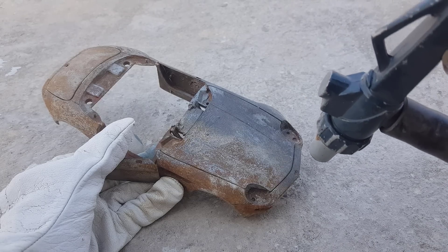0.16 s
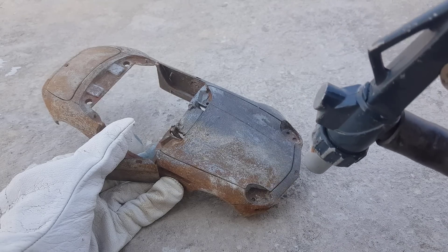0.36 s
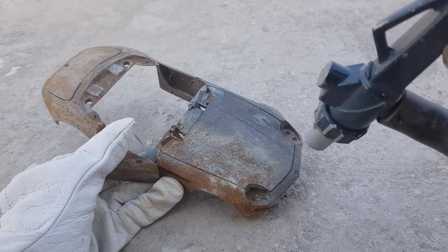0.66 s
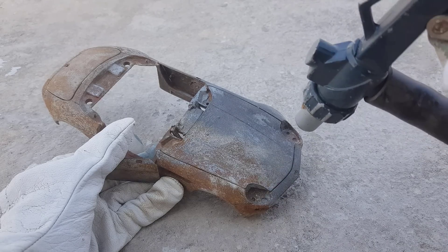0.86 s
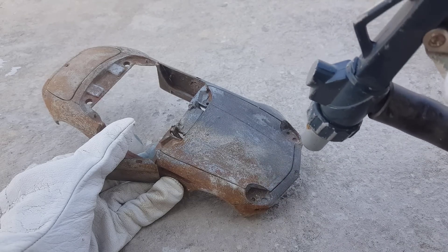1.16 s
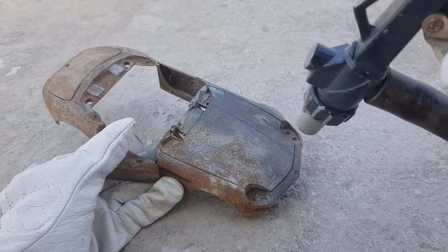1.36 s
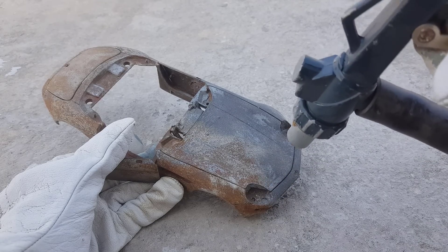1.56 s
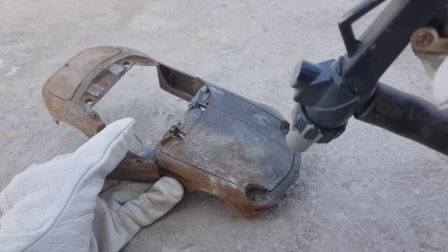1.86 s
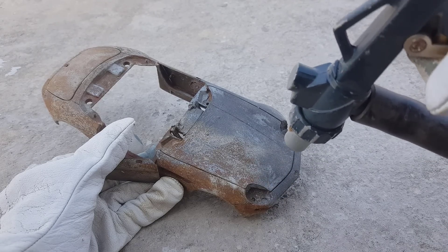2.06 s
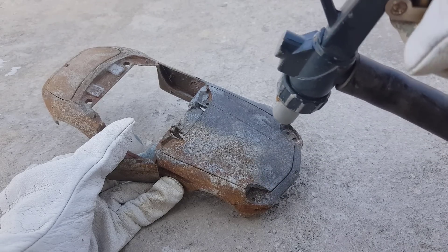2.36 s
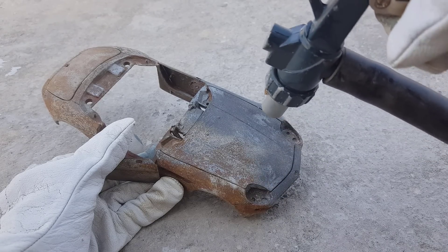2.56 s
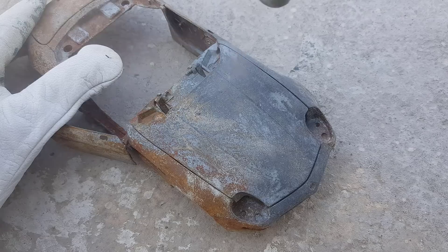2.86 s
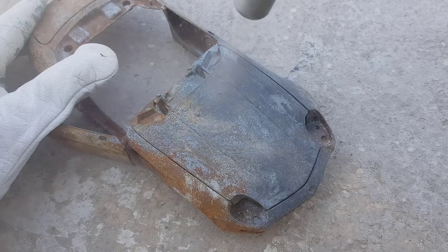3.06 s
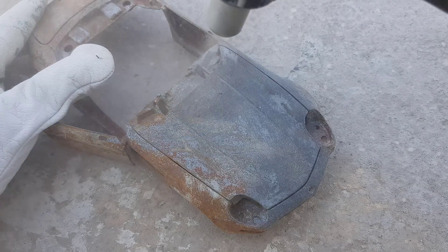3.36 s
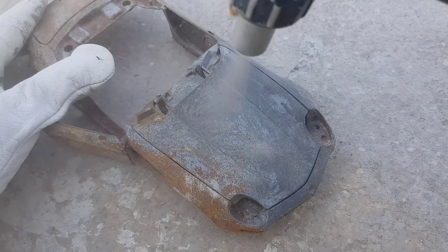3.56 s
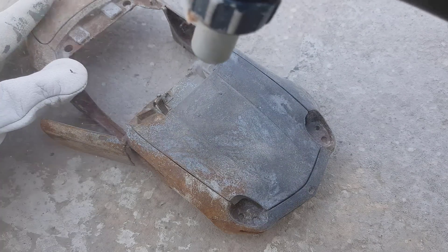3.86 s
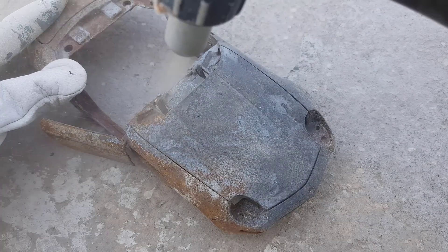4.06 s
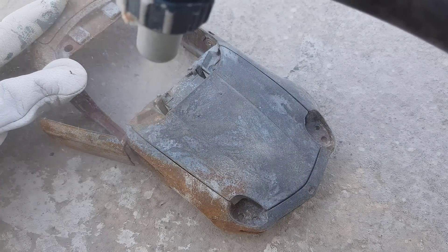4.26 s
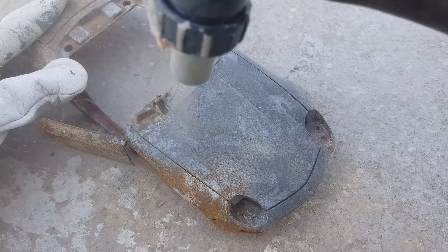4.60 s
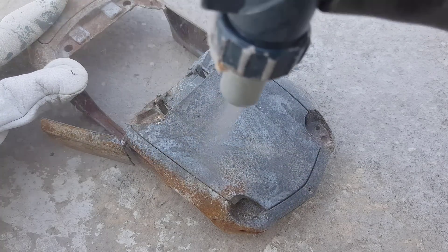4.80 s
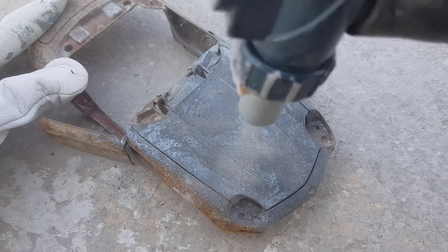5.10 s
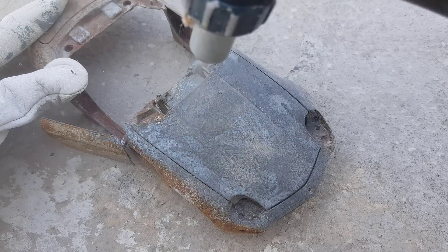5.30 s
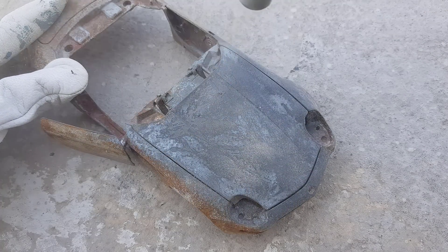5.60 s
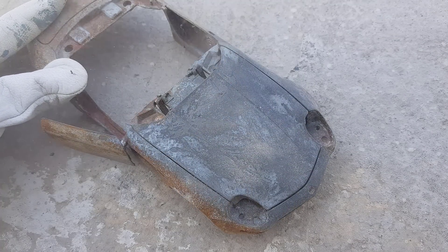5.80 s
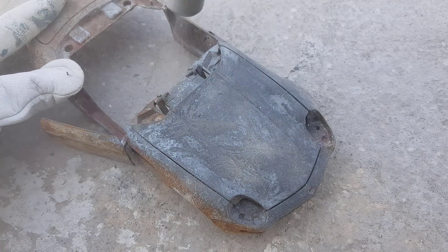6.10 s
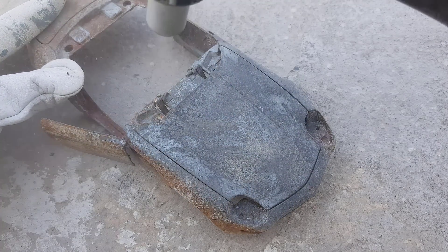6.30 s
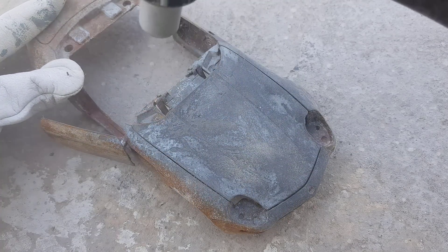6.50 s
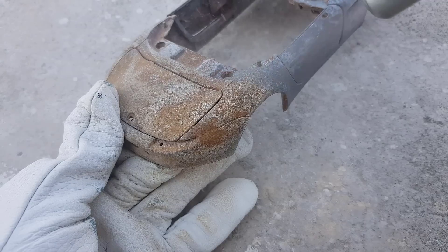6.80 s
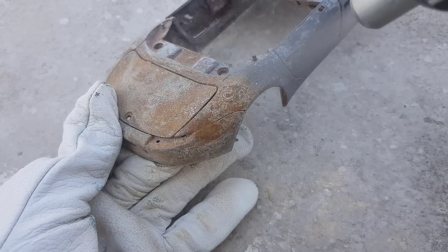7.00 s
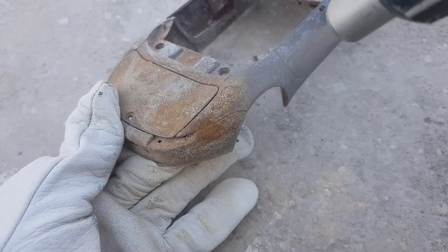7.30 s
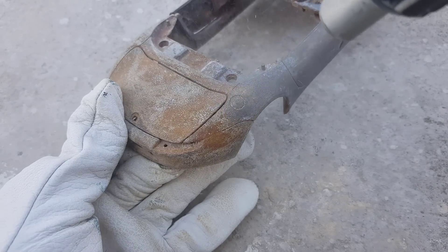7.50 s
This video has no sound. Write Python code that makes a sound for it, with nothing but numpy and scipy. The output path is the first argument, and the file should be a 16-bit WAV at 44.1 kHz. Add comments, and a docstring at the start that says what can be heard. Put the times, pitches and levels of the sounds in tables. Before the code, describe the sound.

A blasting gun hisses steadily, its air-and-grit jet roaring on a small rusty steel shell, the tone shifting abruptly twice.

```python
"""On concrete, a blasting gun sprays air and grit on a small rusty steel shell, heard from three spots in turn.
Filtered noise makes the roar of the jet splashing on the shell and the hiss of the nozzle; dense random clicks
make the patter of grains on steel. Near surfaces echo patter and hiss. Two microphone ports have their own
colour and a small lag; faint gated low noise and very faint short low bursts lie beneath."""
import sys
import numpy as np
from scipy import signal
from scipy.io import wavfile
from scipy.ndimage import uniform_filter1d

SR = 44100
rng = np.random.default_rng(int(sys.argv[2]) if len(sys.argv) > 2 else 0)


def wav_out(sig):
    """Save sig, one row per channel (or a flat mono array), as 16-bit PCM at SR to the path in sys.argv[1]."""
    wavfile.write(sys.argv[1], SR, np.round(np.clip(np.atleast_2d(sig).T, -1, 1) * 32767).astype(np.int16))


N = 337365
WINDOW, HOP = 1024, 256  # samples
FRAME = dict(nperseg=WINDOW, noverlap=WINDOW - HOP)


def undb(db):
    """Amplitude ratio of a level in dB."""
    return 10 ** (np.asarray(db) / 20)


def frames(x):
    """Short-time spectrum, rms 1 over all bins."""
    spectrum = signal.stft(x, **FRAME)[2]
    return spectrum / np.sqrt(np.mean(abs(spectrum) ** 2))


def patches(shape, hz, per_s):
    """Random field, spread 1, smoothed over hz of frequency and 1 / per_s of time."""
    field = rng.standard_normal(shape)
    bins, steps = hz * WINDOW / SR, SR / HOP / per_s
    for axis, size in enumerate((bins, steps)):
        for _ in range(2):
            field = uniform_filter1d(field, max(int(size), 1), axis=axis)
    return field / field.std()


def band_rms(pair, hz, lo_hz, hi_hz):
    """Scale so that the mean of both ports has rms 1 between two frequencies."""
    inside = (hz[:, 0] > lo_hz) & (hz[:, 0] < hi_hz)
    # 4 / 3: one-sided spectrum (2) over the Hann window's noise bandwidth (1.5 bins)
    power = np.sum(np.mean(abs(pair.mean(axis=0)[inside]) ** 2, axis=1)) * 4 / 3
    return pair / np.sqrt(power)


def ports(one, other, table, hz):
    """Colour for both ports; the right hears the shared part shifted in phase, plus sound of its own."""
    at_hz, *columns = np.transpose(table)
    left_db, right_db, like, lag_cycles = (np.interp(np.log(hz), np.log(at_hz), c) for c in columns)
    like = np.clip(like, 0, 1)
    lag = np.exp(-2j * np.pi * lag_cycles)
    left = undb(left_db) * one
    right = undb(right_db) * (like * lag * one + np.sqrt(1 - like ** 2) * other)
    return np.array([left, right])


def air():
    """Turbulence: even noise."""
    return frames(rng.standard_normal(N))


def rumble(hz, s):
    """Faint low noise, gated on and off at random."""
    # noise colour: (frequency [Hz], left [dB], right [dB], likeness of the ports [0-1], right lag [cycles])
    rumble_colour = [(25, -23, -19, 0.1, 0), (69.6, 0, 14, 0.1, 0), (120, -11, 1.5, 0.1, 0),
                     (197, -10, 6.5, 0.32, 0.02), (320, -16, 8.5, 0.3, 0.02), (450, -9, 5, 0.33, 0.03)]
    # gate bias: (time [s], bias [below 0 mostly silent, above 0 mostly sounding])
    gate_bias = [(0, -1), (.7, -1.3), (.8, .5), (1.2, 0.15), (1.5, -0.9), (1.6, -1.6), (2.2, -2),
                 (2.4, 1.3), (2.95, 1), (3.05, -1), (3.2, -0.4), (3.52, 0), (3.68, -1.8), (3.8, -0.18),
                 (4.2, 0), (4.7, -.6), (4.95, -0.2), (5.05, -1.6), (5.35, -1.3), (5.45, 0.7), (5.8, -0.9),
                 (6.55, -1), (6.65, 0.6), (7.65, 0.4)]
    base_db, gate_db_per_unit = -105, 25.5
    low = ports(air(), air(), rumble_colour, hz) * (hz < 500)
    low = band_rms(low, hz, 40, 250)
    gate = 1.34 * patches(low.shape[1:], 100, 24) + np.interp(s, *np.transpose(gate_bias))
    return low * undb(base_db + gate_db_per_unit * np.minimum(gate, 0.9))


def low_bursts(hz, s):
    """Very faint short bell-shaped bursts of low noise, different in each channel."""
    # bursts: (centre [s], length [s], level [dB])
    burst_table = [(.36, 0.044, -90), (.79, .05, -81), (1.48, .05, -88), (2.27, .04, -92),
                   (3.517, 0.11, -74), (4.95, .04, -85), (5.45, .05, -85), (6.68, .07, -84.5)]
    below_hz = 160
    low = np.array([air(), air()]) / (1 + (hz / below_hz) ** 6)
    low = band_rms(low, hz, 40, 250)
    return low * sum(undb(db) * np.exp(-(2 * (s - at) / length) ** 2) for at, length, db in burst_table)


def band_gains(hz, s):
    """Gain of each channel: short narrow-band level changes set by hand left, a moving deaf band right."""
    # left channel changes: (start [s], length [s], centre [Hz], gain [dB])
    changes = [(3.1, .75, 7200, 4), (3.15, .4, 6600, -9), (3.2, 0.46, 8950, -10), (3.82, .8, 9800, -6),
               (4.65, 0.75, 7250, -6), (5.35, .3, 11250, -9), (5.45, 0.72, 9900, -8), (6.7, .4, 10250, -8),
               (7.25, .4, 10400, -10)]
    # right port's deaf band, moving with the nozzle: (time [s], centre [Hz], gain [dB])
    deaf = [(0, 9700, -7), (.3, 9600, -8), (.6, 9800, -3), (1.3, 9600, -7), (1.9, 9500, -23),
            (2.4, 9600, -7), (2.65, 9700, 1), (3.0, 9950, -20), (3.3, 10100, -23), (4.0, 9850, -29),
            (4.2, 10500, -16), (4.45, 10500, -15), (4.65, 9900, -16), (4.95, 10400, -7), (5.25, 9800, -18),
            (5.75, 9900, -20), (6.05, 10300, -12), (6.4, 10100, -6), (6.65, 10050, -18), (7.65, 10000, -12)]
    change_width_hz, change_edge_s, deaf_width_hz = 110, 0.11, 450

    def bell(centre_hz, width_hz):
        return np.exp(-((hz - centre_hz) / width_hz) ** 2)

    def edge(t):
        return np.clip(t / change_edge_s, 0, 1)

    left_db = sum(db * edge(s - at) * edge(at + length - s) * bell(centre_hz, change_width_hz)
                  for at, length, centre_hz, db in changes)
    at, centre_hz, db = np.transpose(deaf)
    right_db = np.interp(s, at, db) * bell(np.interp(s, at, centre_hz), deaf_width_hz)
    return undb([left_db, right_db])


def thin_shared(pair, hz, s):
    """A ragged band near 3 kHz where the shared (mid) sound thins out, by time."""
    # thinned band: (time [s], centre [Hz], mean share lost [0-1, clipped after flicker])
    thin_table = [(2.5, 3220, 0.1), (2.8, 3170, 0.8), (2.95, 3220, 1.1), (3.11, 3190, 1), (3.17, 3150, 0.2),
                  (3.28, 3120, 0.3), (3.33, 3110, 1.0), (3.47, 3030, 1.2), (3.58, 3150, 0.75),
                  (3.68, 3120, 1.1), (3.84, 3130, 1), (3.88, 3100, 0.3), (4.1, 3100, .55), (4.3, 3100, 0.1),
                  (4.45, 3080, 0.4), (4.6, 3140, 0.7), (4.75, 3030, 1.1), (4.9, 3140, 0.7),
                  (5.05, 3150, .65), (5.2, 3150, .8), (5.33, 3040, 0.5), (5.46, 3130, 0.9),
                  (5.62, 3250, 0.5), (5.85, 3120, 0.6), (5.95, 3170, 1.0), (6.12, 3200, 0.4),
                  (6.25, 3200, 0.8), (6.4, 3150, 0), (6.95, 2800, 0), (7.08, 2730, 0.6), (7.22, 2710, 0.7),
                  (7.25, 3000, 0.3), (7.3, 3280, 0.7), (7.41, 3200, 0.6), (7.52, 3350, 0.3),
                  (7.65, 3300, 0.1)]
    width_hz, jitter_hz, flicker, flicker_per_s = 184, 60, 0.4, 30.5
    at, centre_hz, share = np.transpose(thin_table)
    centre_hz = np.interp(s, at, centre_hz) + jitter_hz * patches((1, len(s)), 1, flicker_per_s)
    band = np.exp(-((hz - centre_hz) / width_hz) ** 4)
    share = np.interp(s, at, share) * (1 + flicker * patches(band.shape, 130, flicker_per_s))
    return pair - np.clip(share, 0, 1) * band * pair.mean(axis=0)


def echo(hz, ms, db):
    """What a delayed copy adds at each frequency."""
    return undb(db) * np.exp(-2j * np.pi * hz * ms / 1000)


def grains():
    """Grit striking steel: single-sample clicks of uneven size, too dense to count."""
    grains_per_s, spread_db = 24000, 1
    hit = rng.random(N) < grains_per_s / SR
    return frames(hit * rng.standard_normal(N) * undb(spread_db * rng.exponential(size=N)))


def flares(s):
    """Gain in dB as the jet strikes the shell square on: quick rise, hold, fall."""
    # flares: (start [s], length [s], gain [dB], fall [s])
    flare_table = [(1.518, 0.15, 6, 0.036), (1.79, 0.33, 4.5, 0.11), (2.703, 0.11, 6, 0.044),
                   (4.93, 0.22, 8.5, 0.049)]
    rise_s = 0.046

    def edge(t):
        return np.clip(t, 0, 1)

    return sum(db * edge((s - at) / rise_s) * edge((at + length - s) / fall)
               for at, length, db, fall in flare_table)


def splash_roar(splash, colour, roar_db, tilt_db, pan_db, hz):
    """The jet splashing: mid-band noise with random level patches and random gating below about 500 Hz."""
    skirt_hz, skirt_share = 1030, 0.64
    gated_below_hz, gap_db_per_unit = 498, 12.5
    shape = splash[0].shape
    roar = ports(*splash, colour, hz) / (1 + (hz / 6000) ** 4)
    # a surge swells the core of the roar more than its low skirt
    share = skirt_share + (1 - skirt_share) / (1 + (skirt_hz / hz) ** 6)
    swell_db = roar_db.mean() + share * (roar_db - roar_db.mean())
    octaves = np.log2(np.clip(hz, 700, 3600) / 1800)
    side = np.array([[[.5]], [[-.5]]])  # left, right
    roar = band_rms(roar, hz, 1000, 2800) * undb(swell_db + tilt_db * octaves + side * pan_db)
    roar = roar * undb(0.79 * patches(shape, 900, 10.7) + 1.16 * patches(shape, 180, 16))
    gaps = np.clip(4.4 * patches(shape, 100, 22) + 0.83, 0, 3) / (1 + (hz / gated_below_hz) ** 10)
    return roar * undb(-gap_db_per_unit * gaps)


def grit_patter(grit, colour, from_hz, high, hz):
    """Grains on steel: clicks with the lower range left to the roar."""
    patter = ports(*grit, colour, hz) * np.sqrt(1 - high) / (1 + (from_hz / hz) ** 12)
    return band_rms(patter, hz, 3500, 7000)


def nozzle_hiss(jet, colour, high, hz):
    """Air leaving the nozzle: the top range of even noise."""
    return band_rms(ports(*jet, colour, hz) * np.sqrt(high), hz, 11000, 15500)


def level_patches(shape):
    """Gain of random broad level changes and random brief narrow dips, rms 1."""
    dips = np.clip(patches(shape, 130, 23), 0, 2.1) ** 3.0
    gain = undb(0.43 * patches(shape, 2300, 22) - 2.7 * dips)
    return gain / np.sqrt(np.mean(gain ** 2))


def blast(flow, hiss_db, pan_db, splash_colour, spot, grit_from_hz, echoes, hz, s, splash, grit, jet):
    """One spot: roar plus patter and hiss of uneven level, these two again by way of near surfaces."""
    flare_grit_share = 0.26  # part of the flare gain that the patter takes
    # a flare is brighter, a louder roar sits further right
    tilt_per_flare_db, pan_per_roar_db = 0.2, -0.09
    tilt_wander_db, hiss_wander_db = 1.17, 1.46
    hiss_from_hz = 8800
    at, *columns = np.transpose(flow)
    roar_db, tilt_db, grit_db = (np.interp(s, at, c) for c in columns)
    flare_db = flares(s)
    roar_db = roar_db + flare_db
    grit_db = grit_db + flare_grit_share * flare_db
    shape = grit[0].shape

    def wander(per_s):
        return patches((1, shape[1]), 1, per_s)

    tilt_db = tilt_db + tilt_per_flare_db * flare_db + tilt_wander_db * wander(21.0)
    pan_db = pan_db + pan_per_roar_db * (roar_db - roar_db.mean())
    hiss_db = hiss_db + hiss_wander_db * wander(4.3)
    high = 1 / (1 + (hiss_from_hz / hz) ** 8)  # crossover from patter to hiss
    roar = splash_roar(splash, splash_colour, roar_db, tilt_db, pan_db, hz)
    patter = grit_patter(grit, spot, grit_from_hz, high, hz) * undb(grit_db)
    hiss = nozzle_hiss(jet, spot, high, hz) * undb(hiss_db)
    paths = 1 + sum(echo(hz, ms, db) for ms, db in echoes)
    return roar + (patter + hiss) * level_patches(shape) * paths


def scene():
    """The three spots follow each other without a pause, over faint low noise and bursts."""
    # aim of the jet, one table a spot, before flares and wander:
    # (time [s], splash roar [dB], roar tilt [dB/octave], grit patter [dB])
    flow = [
        [(0.0, -37.5, -0.5, -42.5), (0.15, -36, 1.5, -44), (0.34, -35.5, 2, -38.5), (0.5, -36, 0.5, -39),
         (0.6, -37, 1.5, -44), (0.8, -36.5, 2, -47), (.9, -37, -0.5, -45), (.95, -33.5, 0.5, -47),
         (1.02, -36, 0.5, -43.5), (1.3, -35.5, 2, -45), (1.51, -37, 1.2, -44.5), (2.12, -36.5, -1, -43.5),
         (2.2, -42, -1.5, -43.5), (2.5, -39.5, 0, -48), (2.728, -40, -2.5, -48)],
        [(2.728, -41, -1.5, -43), (2.85, -41.5, -0.5, -45), (3.1, -42.5, 2, -46), (3.17, -46, 1.5, -46),
         (3.26, -38.5, 0, -45.5), (3.62, -43, 0.5, -46), (3.8, -41, -1.5, -45), (4.1, -44, 0, -45.5),
         (4.45, -43.5, -1.5, -45), (4.62, -41.5, -3, -45), (4.92, -38, -2.3, -44), (5.16, -39.5, 1.5, -47),
         (5.22, -38, -1.5, -43.5), (5.32, -40, -0.5, -45), (5.65, -35, 2, -44.5), (5.73, -33.5, 1.5, -43),
         (6.03, -35, 2, -43.5), (6.27, -31.5, -1.5, -42), (6.44, -35.5, -1.5, -44), (6.52, -33, 0, -44),
         (6.585, -35.5, 0, -43.5)],
        [(6.585, -42.5, -4.5, -41.5), (6.68, -41.5, -2.5, -42.5), (6.79, -46, 0, -43.5), (6.88, -43, 0.3, -44),
         (7.12, -39.5, -0.3, -43.5), (7.25, -40.5, -1.5, -43.5), (7.38, -47.5, -2, -43.5),
         (7.47, -46.5, -3.5, -43.5), (7.65, -44, 1.5, -44)],
    ]
    # patter and hiss colour, one table a spot:
    # (frequency [Hz], left [dB], right [dB], likeness of the ports [0-1], right lag [cycles])
    spot_colour = [
        [(2510, -2.3, 2.7, 0.8, 1.18), (3300, 2, -4.5, 0.14, 0.38), (3900, -5, -32, 0.35, 0.62),
         (4250, 0.3, -12, 0.36, 0.66), (4940, 0.2, -5.5, 0.8, 0.8), (5550, -4.5, -8.5, 0.5, 0.85),
         (6060, -0.5, -8, 0.66, 0.77), (7140, -11.5, -13.5, 0.4, 1.2), (7520, -3.5, -29, 0.19, 1.02),
         (8400, -15, -27, 0.13, 1.14), (9450, -12.5, -29, 0.23, 0.7), (10000, -20, -46, 0.03, 0.39),
         (11000, -13.5, -26, 0.21, 1.01), (12100, -9, -17.5, 0.08, 0.96), (12300, -17.5, -17, 1, 0.71),
         (13800, -16.5, -14.5, 1, 1.0), (15400, -11.5, -13.5, 1, 1.0)],
        [(3000, -1, -4.5, 0.17, 0.46), (3200, -1, -0.5, 0.36, 0.53), (3650, -1, -9, 0.4, 0.83),
         (4250, -2.5, -24, 0.15, 0.9), (4700, -2, -17.5, 0.4, 0.75), (5300, -2.5, -10.5, 0.06, 0.88),
         (5880, 1.6, -17, 0.3, 0.7), (6320, -6.5, -10.7, 0.1, 0.98), (6650, -8.5, -15, 0.7, 0.99),
         (7000, -4, -6, 0.8, 0.66), (7250, -13, -13.5, 1, 1.1), (7600, -6, -14.5, 0.7, 1.0),
         (8060, -10.5, -18, 0.3, 0.98), (8700, -8, -25, 0.13, 0.97), (9800, -12.5, -26, 0.03, 0.5),
         (10960, -10, -40, 0.07, 1.11), (11900, -6.5, -8, 0.8, 1.1), (12700, -8.5, -10.5, 0.95, 1.0),
         (14200, -8.1, -4.5, 0.76, 1.0), (15200, -5.5, -7, 1, 1.0)],
        [(2780, -9.5, -10.4, 0.5, 0.3), (3150, -7.5, -6.5, 0.44, 0.31), (3500, -7, -13.2, 0.55, 0.47),
         (4220, -6, -20.6, 0.32, 0.64), (4800, -3, -23, 0.13, 0.48), (5400, -6, -17.4, 0.34, 1.08),
         (5750, 0, -14.7, 0.53, 0.66), (6100, -2.5, -11.5, 0.7, 0.97), (6800, -9.5, -12.5, 0.3, 0.94),
         (7550, -13.5, -15.4, 1, 1.0), (8000, -12.5, -13.7, 0.76, 1.2), (8700, -11, -22.6, 0.13, 0.93),
         (9500, -15, -28.2, 0.16, 1.04), (10250, -23.1, -34.9, 0.02, 1.16), (10900, -16.3, -22.6, 0.21, 0.98),
         (12000, -10.5, -17.3, 0.71, 1.0), (12800, -18, -19.6, 0.93, 1.0), (14000, -14, -14, 0.99, 1.0),
         (15200, -10.5, -10, 1, 1.01)],
    ]
    # splash colour on the shell, one table a spot, columns as above
    roar_colour = [
        [(300, -92, -69, 0.1, 0.23), (496, -30.5, -33, 0.5, 0.14), (713, -23.5, -34, 1, 0.33),
         (1050, -19.5, -31, 0.8, -0.43), (1113, -14.5, -13, 0.57, -0.13), (1360, -7.5, -8, 0.83, 0.12),
         (1820, 0, -1, 0.99, 0.16), (2246, -3.5, -10.5, 0.58, -0.036), (2440, -14, -11.5, 0.74, -0.19),
         (3030, -11.5, -13.5, 0.4, 0.4), (4700, -18.5, -27.5, 0.95, 1)],
        [(308, -96, -69, 0, 0.08), (512, -29.5, -36.5, 0.6, 0.02), (720, -21.5, -37.5, 0.3, 0.06),
         (962, -13.5, -28, 0.4, 0.08), (1044, -6, -16, 0.95, 0.14), (1480, -4, -8.5, 0.86, 0.089),
         (1840, -2, 0, 0.74, 0.058), (2150, -2, 0, 1, 0.32), (2453, -3, -4, 0.64, 0.28),
         (2780, -12.5, -12.5, 0.12, 0.41), (3200, -12.5, -12.5, 0.93, 0.66), (3830, -16.5, -20.5, 0.1, 0.52),
         (4570, -21.5, -33, 0.3, 0.9)],
        [(302, -80, -67, 0, -0.21), (496, -23.5, -26, 0.45, -0.12), (700, -20.5, -32, 0.7, 0.28),
         (954, -11.5, -22, 0.7, -0.096), (1116, -2.5, -10, 0.7, 0.17), (1460, -1, -3, 1, -0.16),
         (1870, -4, -1.5, 0.9, 0.24), (2200, 0, -2.5, 0.6, 0.1), (2620, -17, -8, 0.4, 0.046),
         (3000, -10.5, -22, 0.6, 0.15), (4600, -29, -26, 0.4, 0.98)],
    ]
    # still surfaces close to the gun (shell, hand, ground), one table a spot: (lag [ms], level [dB])
    echoes = [
        [(.47, -24), (1.0, -23.5)],
        [(.5, -55), (1.07, -19), (2.1, -23)],
        [(0.88, -33), (2.5, -14), (1.2, -37)],
    ]
    # lower edge of the patter, each spot: [Hz]
    grit_from_hz = [2070, 2830, 1900]
    # mean nozzle hiss, each spot: [dB]
    hiss_db = [-43, -43, -44.5]
    # left minus right added to the roar at its mean level, each spot: [dB]
    pan_db = [0.5, 0.5, 1.5]
    splash = np.array([air(), air()])
    grit = np.array([grains(), grains()])
    jet = np.array([air(), air()])
    hz = np.maximum(np.arange(WINDOW // 2 + 1)[:, None] * SR / WINDOW, 1)
    s = np.arange(jet.shape[2]) * HOP / SR
    out = rumble(hz, s) + low_bursts(hz, s)
    which = np.searchsorted([table[0][0] for table in flow[1:]], s)
    for k in range(len(flow)):
        now = which == k
        sources = (source[:, :, now] for source in (splash, grit, jet))
        out[:, :, now] += blast(flow[k], hiss_db[k], pan_db[k], roar_colour[k], spot_colour[k],
                                grit_from_hz[k], echoes[k], hz, s[now], *sources)
    heard = thin_shared(out * band_gains(hz, s), hz, s)
    return signal.istft(heard, **FRAME)[1][:, :N]


def record(dry):
    """The recorder thins the bass and cuts the top."""
    bass_hz, top_hz = 45, 15650
    thin = signal.sosfilt(signal.butter(2, bass_hz, "high", fs=SR, output="sos"), dry)
    return signal.sosfilt(signal.ellip(14, .3, 70, top_hz, fs=SR, output="sos"), thin)


dry = scene()
out = record(dry)
wav_out(out)
```